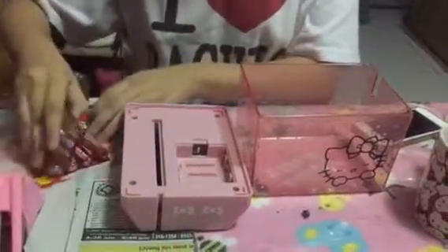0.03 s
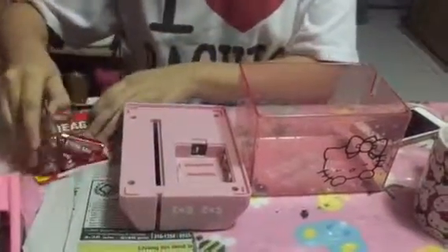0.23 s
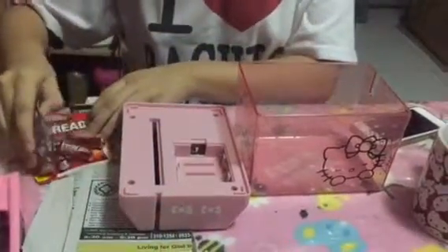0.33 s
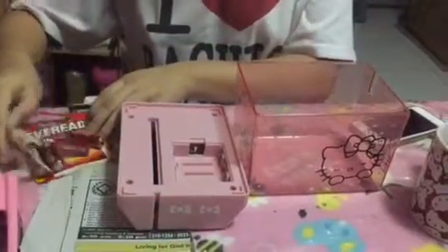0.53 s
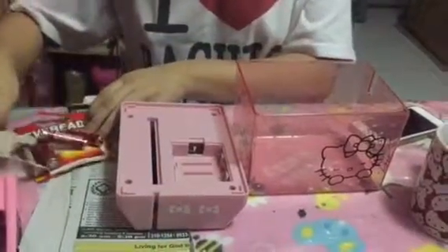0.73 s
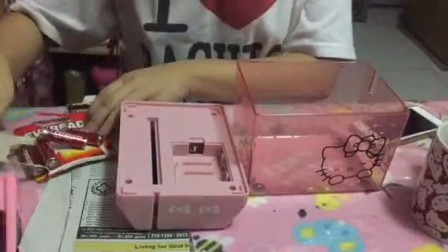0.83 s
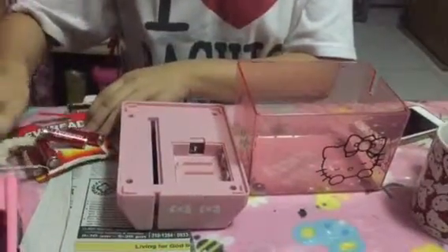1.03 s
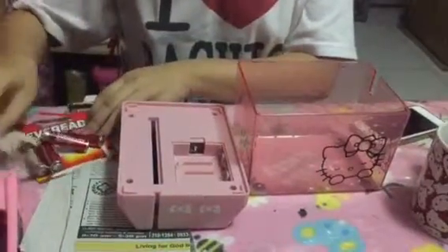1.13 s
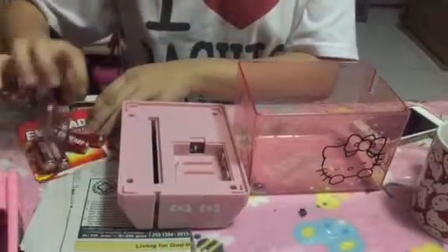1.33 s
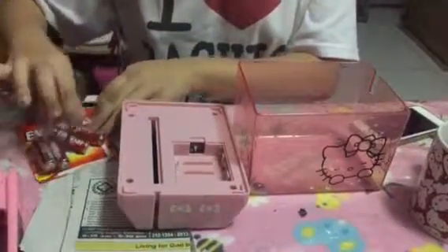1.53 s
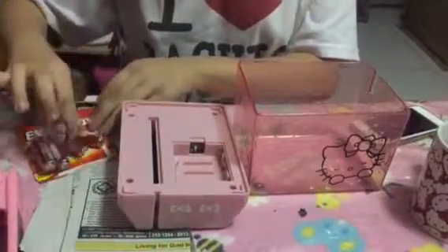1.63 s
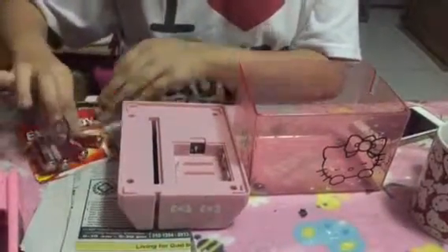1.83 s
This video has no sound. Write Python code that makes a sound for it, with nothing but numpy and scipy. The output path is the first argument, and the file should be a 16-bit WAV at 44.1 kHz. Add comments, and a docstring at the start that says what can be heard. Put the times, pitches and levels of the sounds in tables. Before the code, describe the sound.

A plastic packet crinkles in scattered snaps as a hand picks at it, with soft table bumps. It slides with a hiss, then batteries inside knock lightly on the table, close by in a small room.

```python
"""A hand picks at a plastic battery packet on a table in a small room.
First the stiff film crinkles and buckles in scattered snaps, the sharpest near 0.6 s, with soft bumps
on the table. Then it slides under the fingers with a bright hiss. From about 1.1 s, amid more snaps,
the batteries inside give their hardest knocks on the table, and a few faint ones end the scene.
All along, the room adds a short echo over faint noise, a low hum, a hollow tone and a few soft blips."""
import sys
import numpy as np
from scipy import signal
from scipy.io import wavfile

SR = 44100
rng = np.random.default_rng(int(sys.argv[2]) if len(sys.argv) > 2 else 0)


def unload_wav(signal):
    """Save mono or channel-first audio to the path in sys.argv[1] as 16-bit WAV at rate SR, clipped to [-1, 1]."""
    wavfile.write(
        sys.argv[1],
        SR,
        np.round(np.clip(np.atleast_2d(signal).T, -1, 1) * 32767).astype(np.int16),
    )


N = 83790
TOP_HZ = 15500  # upper edge of the sound
BURST_S = .007  # a snap or knock has the energy of its level held for this long

# The ways a patch of film rings: (multiple of its pitch [ratio], level [dB])
FILM_MODES = [(.6, -6.5), (1, 3), (1.77, -7), (2.43, -19.5)]
def snap(hz, patch_db, crack_db, fizz_db, crack_hz, decay_ms, size=1024):
    """A crease flips: one kick and a dying flurry of slips ring a patch of film and spray treble."""
    patch_top_hz, crack_top_hz = 3200, 8620
    t = np.arange(size) / SR
    decay_s = decay_ms / 1000
    flurry = np.exp(-t / decay_s) * (1 - np.exp(-t / .00013))
    flex = np.exp(-t / decay_s / 1.01) * (1 - np.exp(-t / .00018))  # the patch bends more slowly
    slips = rng.standard_normal((3, size)) * [flex, flurry, flurry]
    slips[:, 0] += 1.67 * np.sqrt(decay_ms)  # the first kick
    ring = sum(amp(db) * resonate(slips[0], hz * ratio, q=3.2) for ratio, db in FILM_MODES)
    ring = band(ring, .48 * hz, "highpass", order=4)  # a patch gives off little far below its pitch
    patch = band(ring, patch_top_hz, "lowpass", order=2)
    crease = resonate(slips[1], crack_hz, q=2.37)
    crack = band(crease, [patch_top_hz, crack_top_hz], "bandpass", order=2)
    fizz = band(slips[2], [crack_top_hz, TOP_HZ], "bandpass")
    burst = at_level(patch, patch_db) + at_level(crack, crack_db) + at_level(fizz, fizz_db)
    return np.sqrt(BURST_S * SR / size) * burst


# The ways a knock rings: (multiple of its pitch [ratio], level [dB], fade time [s])
BATTERY_MODES = [(.48, -9, 0.0011), (1, 7.5, 0.0012), (2.05, -0.5, 0.0017)]
def knock(hz, db, contact_s=.00052, size=1024):
    """A battery hits the table through the film: a few tones that die almost at once."""
    t = np.arange(size) / SR
    ring = sum(amp(mode_db) * np.exp(-t / decay_s) * np.sin(2 * np.pi * hz * ratio * t)
               for ratio, mode_db, decay_s in BATTERY_MODES)
    return np.sqrt(BURST_S * SR / size) * at_level(ring * (1 - np.exp(-t / contact_s)), db)


# How loud the dull crumpling is: (time [s], level [dB])
CRUMPLE_LEVELS = [(0, -62.5), (.04, -61), (.12, -65.5), (.17, -75), (.205, -57.5), (.24, -72), (.29, -76),
                  (.335, -62), (.36, -55.5), (.44, -56.5), (.5, -66.5), (.7, -64), (.8, -64.5), (.835, -63),
                  (.88, -51.5), (.95, -74), (1.115, -77), (1.135, -50), (1.17, -51), (1.21, -62.5),
                  (1.275, -56.5), (1.31, -70.5), (1.7, -72.5), (1.75, -64), (1.79, -69.5)]
# Its mix of low and high sound: (frequency [Hz], level [dB])
CRUMPLE_TONE = [(100, 2.5), (450, -8), (900, 4), (1900, 2.5), (3200, -3.5), (6000, -9), (10000, -15.5),
                (16000, -49)]
# How loud the bright hiss of sliding film is: (time [s], level [dB])
SLIDE_LEVELS = [(0, -58.5), (.13, -68.5), (.205, -58.5), (.24, -55.5), (.29, -74), (.39, -70), (.46, -60),
                (.485, -72), (.575, -66.5), (.605, -39.5), (.66, -56.5), (.745, -65), (.77, -58.5),
                (.83, -55), (.865, -47.5), (.94, -56), (1.0, -53), (1.085, -58.5), (1.118, -72),
                (1.14, -46), (1.19, -58), (1.225, -62), (1.27, -57.5), (1.32, -76)]
# Its mix of low and high sound: (frequency [Hz], level [dB])
SLIDE_TONE = [(200, -25), (1500, 4), (4000, -5), (7000, 3), (11000, 6), (16000, 8)]
def crinkle():
    """The film crumples and slides under the fingers."""
    crumple = gain_curve(CRUMPLE_LEVELS) * tiny_slips(CRUMPLE_TONE, per_s=1500, spread_db=3)
    slide = gain_curve(SLIDE_LEVELS) * tiny_slips(SLIDE_TONE, per_s=5600, spread_db=5)
    return crumple + slide


def tiny_slips(tone, per_s, spread_db):
    """Thousands of slips of uneven size each make a click and blur into a rustle."""
    sizes = amp(spread_db * np.minimum(rng.exponential(1, N), 4))
    clicks = sizes * rng.choice([-1, 1], N) * (rng.random(N) < per_s / SR)
    return at_level(band(shape_tone(clicks, tone), TOP_HZ, "lowpass"))


# The film buckling: (time [s], patch pitch [Hz], patch level [dB], crack level [dB],
# fizz level [dB], crack pitch [Hz], fade time [ms])
FILM_SNAPS = [(0.0484, 1560, -46, -46.5, -50, 4020, 0.26), (.1750, 1350, -55, -56.5, -56.5, 5500, 3.4),
              (0.212, 2250, -41, -52.5, -48.5, 3830, 0.69), (0.2224, 1890, -35.5, -51, -60, 5450, 0.23),
              (0.3469, 990, -47, -46.5, -43, 5760, 4.2), (.3645, 1460, -54.5, -66, -54, 5500, 1.3),
              (0.387, 1050, -46, -54, -56, 5750, 2.6), (0.394, 1560, -45.5, -65, -56, 5040, 2.7),
              (0.4027, 1800, -51, -49.5, -51.5, 5560, 2.5), (0.432, 1400, -47, -55, -54, 5000, 2.4),
              (0.4346, 1850, -36.5, -37.5, -47, 6500, 0.76), (0.5344, 2400, -55.5, -74, -68, 4580, 1.6),
              (0.5864, 2300, -33, -27, -31, 6970, 0.35), (.5884, 1470, -37, -44.5, -51, 5960, 0.5),
              (0.5973, 2600, -30, -37.5, -26.5, 5300, 1.4), (.6240, 2550, -46, -52, -62, 5500, 3),
              (0.702, 1650, -65, -54.5, -49.5, 5200, 0.7), (0.7614, 1670, -48.5, -47.5, -44.5, 6000, 2.4),
              (0.849, 970, -54.5, -43.5, -60, 5700, 1.3), (0.8717, 1580, -59, -51, -67, 4900, 1.7),
              (0.9237, 2090, -45, -54, -50, 4300, 2.5), (1.1456, 1850, -40, -43, -43.5, 5930, 0.7),
              (1.1659, 1840, -40.5, -40.5, -50, 5460, 2), (1.1744, 2300, -48.5, -49, -57, 4500, 2.2),
              (1.1823, 2300, -46, -40.5, -41, 7000, 1.2), (1.2419, 2220, -48, -47, -40.5, 6800, 3.6)]
# Batteries hitting the table: (time [s], pitch [Hz], level [dB])
BATTERY_KNOCKS = [(.048, 520, -62), (.2226, 1183, -43.5), (1.1366, 970, -41.5), (1.1662, 761, -38),
                  (1.1864, 930, -44), (1.2665, 1125, -50), (1.365, 1040, -59.5), (1.744, 820, -59.5)]
# The overall tone of the snaps, knocks and crinkling, with a narrow dip in the high treble:
# (frequency [Hz], boost or cut [dB])
OVERALL_TONE = [(60, -33), (300, -14), (450, -2), (700, 1), (1000, 2.5), (1250, -3), (1500, 2.5),
                (2000, 1.5), (2800, 0), (3600, 0), (6500, -0.5), (7800, -3.5), (9000, -0.5), (9800, -3),
                (10500, -8), (11600, 0), (13200, -6.5), (14300, -4), (15200, -7.5)]
def packet():
    """The handled packet: snaps and knocks over crinkling film."""
    out = crinkle()
    for start_s, *settings in FILM_SNAPS:
        add(out, start_s, snap(*settings))
    for start_s, *settings in BATTERY_KNOCKS:
        add(out, start_s, knock(*settings))
    return shape_tone(out, OVERALL_TONE)


# Soft bumps on the table: (time [s], level [dB], fade time [s])
TABLE_BUMPS = [(0.346, -46, 0.02), (0.395, -55.5, 0.041), (0.436, -51.5, 0.026), (0.587, -54, 0.037),
               (0.774, -65.5, 0.074), (0.87, -64.5, 0.038), (1.02, -56, 0.018), (1.131, -44.5, 0.011),
               (1.166, -50, 0.023)]
# Their deep, dull sound: (frequency [Hz], level [dB])
BUMP_TONE = [(25, -55), (65, 5), (130, -8), (220, -2.5), (400, -17.5), (800, -16), (3000, -117)]
def table_bumps(rise_s=.0035):
    """Hand and packet bump the table, making low thuds that die quickly."""
    out, t = np.zeros(N), np.arange(SR // 4) / SR
    for start_s, db, decay_s in TABLE_BUMPS:
        thud = at_level(shape_tone(rng.standard_normal(len(t)), BUMP_TONE), db)
        add(out, start_s, thud * np.exp(-t / decay_s) * (1 - np.exp(-t / rise_s)))
    return out


# How long the room's echo lasts: (frequency [Hz], time to fade by 60 dB [s])
ECHO_FADE = [(150, 0.17), (1500, 0.16), (5000, 0.11), (15000, 0.18)]
# The tone of the echo: (frequency [Hz], boost or cut [dB])
ECHO_TONE = [(200, 1.5), (800, 0), (1300, 0), (2000, 1), (2900, 4), (4000, 2.5), (15000, -10)]
def room_echo(x, bounces_per_s=6000, build_s=.0021, echo_db=-6.5):
    """Sound bounces around the small room so often that it blurs into a short tail."""
    size = SR // 2
    bounces = rng.standard_normal(size) * (rng.random(size) < bounces_per_s / SR)
    hz, t, spectrum = signal.stft(bounces, SR, nperseg=256)
    fade = amp(-60 * t / look_up(ECHO_FADE, hz)[:, None])
    _, tail = signal.istft(spectrum * fade, SR, nperseg=256)
    tail *= np.clip(np.arange(len(tail)) / SR / build_s, 0, 1) ** 2
    echo = signal.fftconvolve(x, tail / np.linalg.norm(tail))[:N]
    return amp(echo_db) * shape_tone(echo, ECHO_TONE)


# Faint, short ringing notes: (time [s], pitch [Hz], level [dB], length [s])
SOFT_BLIPS = [(0.284, 910, -64.5, 0.037), (0.473, 908, -60, 0.019), (.699, 5330, -68, .032),
              (1.421, 925, -64, 0.021)]
def blips():
    """Soft notes swell and fade with a slightly unsteady pitch."""
    out = np.zeros(N)
    for start_s, hz, db, length_s in SOFT_BLIPS:
        t = np.arange(0, length_s, 1 / SR)
        tone = np.sin(2 * np.pi * hz * t + .7 * wobble(speed_hz=45)[:len(t)])
        add(out, start_s, at_level(tone * np.sin(np.pi * t / length_s), db))
    return out


# The tones of the hum: (pitch [Hz], level [dB])
HUM_TONES = [(119.5, -71), (583, -75.5)]
# How loud the hollow low tone is: (time [s], level [dB])
HOLLOW_LEVELS = [(0, -76.5), (.26, -69), (.31, -61), (.45, -60.5), (.55, -63.5), (.71, -65), (.785, -54.5),
                 (.84, -74.5), (1.49, -72.5), (1.54, -59.5), (1.58, -84.5), (1.9, -67)]
def hum(hollow_hz=301.3, wobble_hz=18):
    """A low hum and a hollow tone that swells and fades, both wavering in loudness and pitch."""
    out, t = np.zeros(N), np.arange(N) / SR
    tones = [(hz, amp(db)) for hz, db in HUM_TONES] + [(hollow_hz, gain_curve(HOLLOW_LEVELS))]
    for hz, gain in tones:
        flutter = 1 + .53 * wobble(wobble_hz)
        tone = np.sin(2 * np.pi * hz * t + .56 * wobble(wobble_hz))
        out += gain * at_level(flutter * tone)
    return out


# The room's steady noise: (frequency [Hz], relative level [dB])
NOISE_TONE = [(20, -27), (40, -18.5), (60, -1), (90, -7.5), (150, -8), (260, -6), (420, -18), (650, -16.5),
              (900, -21.5), (1200, -17.5), (1550, -9), (2200, -30.5), (3000, -28), (5000, -41),
              (6200, -29.5), (6900, -19.5), (7700, -35.5), (10500, -48.5), (15000, -40)]
def room_noise():
    """A faint, even rush, strongest in the bass."""
    return at_level(shape_tone(rng.standard_normal(N), NOISE_TONE), db=-65.5)


def amp(db):
    """Turns decibels into a multiplier."""
    return 10 ** (np.asarray(db) / 20)


def at_level(x, db=0):
    """Scales a sound to an average (rms) level; 0 dB means 1."""
    return amp(db) * x / np.sqrt(np.mean(x ** 2) + 1e-20)


def look_up(points, hz):
    """Reads between a table's rows, with frequency spaced by octaves."""
    row_hz, values = np.transpose(points)
    return np.interp(np.log(hz + 1), np.log(row_hz + 1), values)


def gain_curve(points):
    """Joins rows of (time [s], level [dB]) into a multiplier for each sample."""
    return amp(np.interp(np.arange(N) / SR, *np.transpose(points)))


def add(mix, start_s, sound):
    """Mixes a sound in at a given time."""
    part = mix[round(start_s * SR):][:len(sound)]
    part += sound[:len(part)]


def shape_tone(x, points, size=4096):
    """Boosts or cuts each frequency as a table says, never ringing ahead of the sound."""
    log_gain = np.log(amp(look_up(points, abs(np.fft.fftfreq(size, 1 / SR)))))
    response = np.exp(np.conj(signal.hilbert(log_gain)))
    taps = np.fft.ifft(response).real
    return signal.fftconvolve(x, taps[:size // 2])[:len(x)]


def band(x, hz, kind, order=3):
    """Keeps only the lows, the highs or a range between."""
    return signal.sosfilt(signal.butter(order, hz, kind, fs=SR, output="sos"), x)


def resonate(x, hz, q):
    """Makes a sound ring at one pitch; a higher q rings longer."""
    return signal.lfilter(*signal.iirpeak(hz, q, SR), x)


def wobble(speed_hz):
    """A smooth random wavering, about 1 in size."""
    keep_slow = np.exp(-(np.fft.fftfreq(N, 1 / SR) / speed_hz) ** 2)
    return at_level(np.fft.ifft(np.fft.fft(rng.standard_normal(N)) * keep_slow).real)


def scene(echo_count=3, cycles_per_s=22):
    """Packet and table in the room; echoes take turns, keeping the tail smooth and free of ringing."""
    near = packet() + table_bumps()
    turn = 2 * np.pi * cycles_per_s * np.arange(N) / SR
    shares = np.maximum([np.cos(turn + 2 * np.pi * k / echo_count) for k in range(echo_count)], 0)
    shares /= np.linalg.norm(shares, axis=0)  # keeps the total power steady
    echoes = sum(room_echo(near * share) for share in shares)
    return (near + echoes + blips() + hum() + room_noise())[None]


def record(dry):
    """Cuts off the very highest treble."""
    lowpass = signal.firwin(255, TOP_HZ, window=("kaiser", 8), fs=SR)
    return signal.oaconvolve(dry, lowpass[None], "same")


dry = scene()
out = record(dry)
unload_wav(out)
```